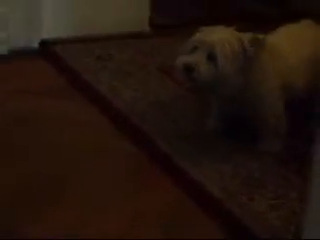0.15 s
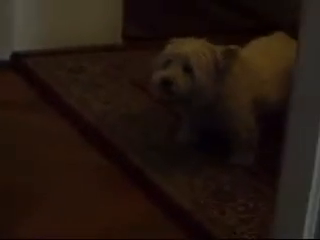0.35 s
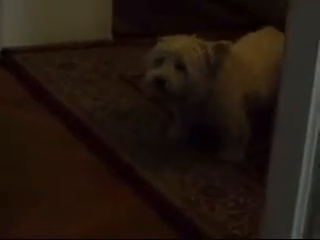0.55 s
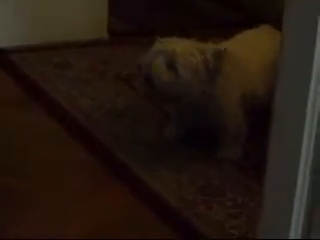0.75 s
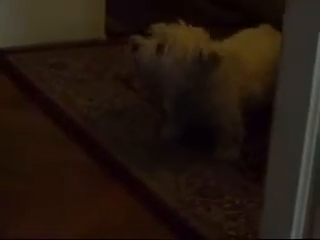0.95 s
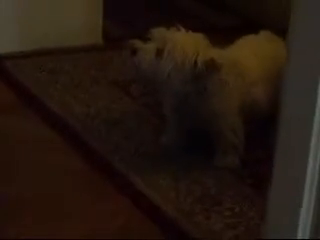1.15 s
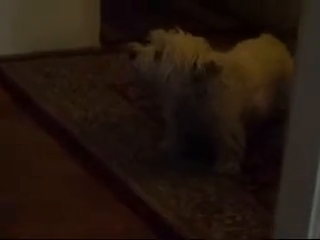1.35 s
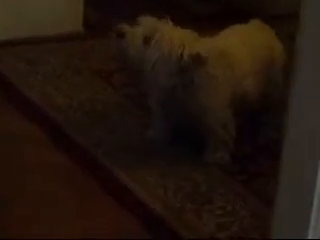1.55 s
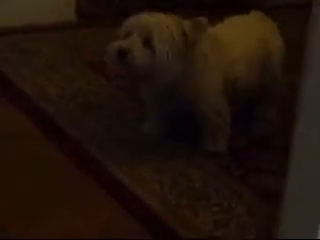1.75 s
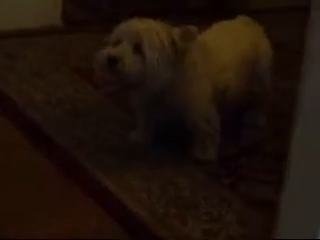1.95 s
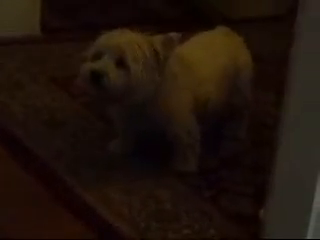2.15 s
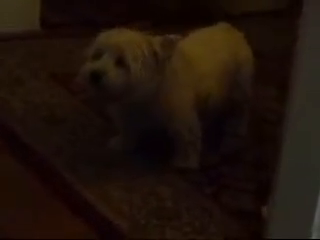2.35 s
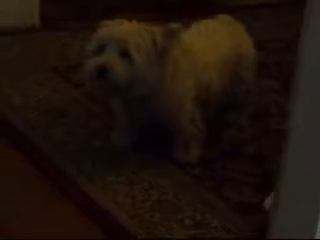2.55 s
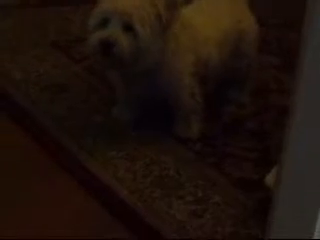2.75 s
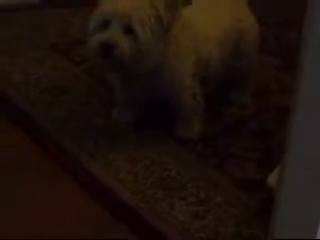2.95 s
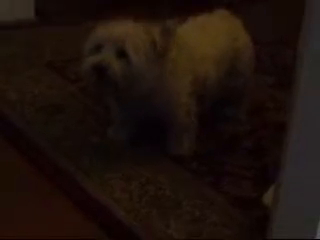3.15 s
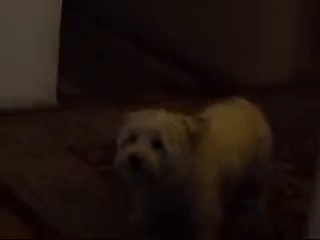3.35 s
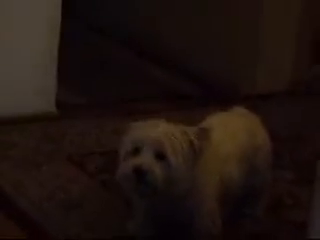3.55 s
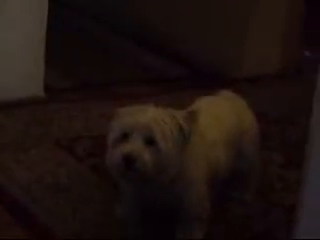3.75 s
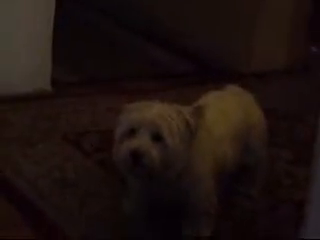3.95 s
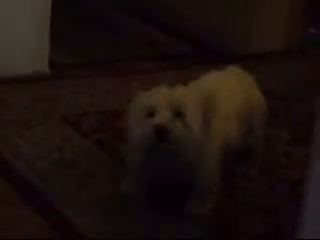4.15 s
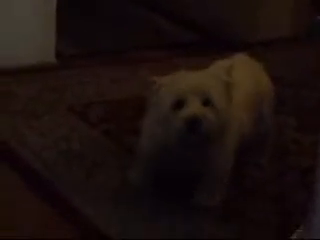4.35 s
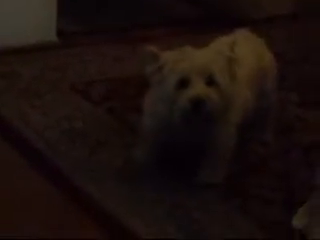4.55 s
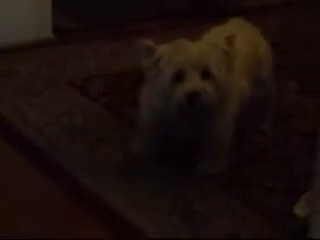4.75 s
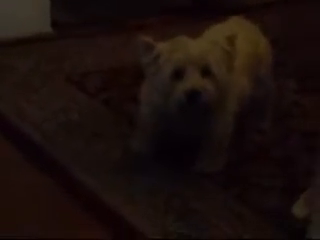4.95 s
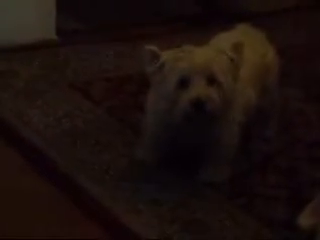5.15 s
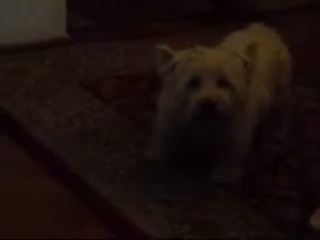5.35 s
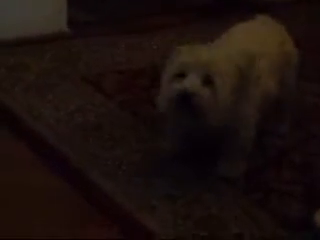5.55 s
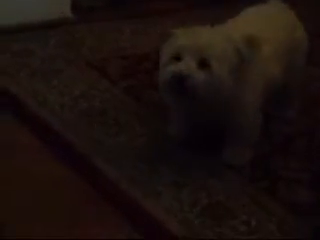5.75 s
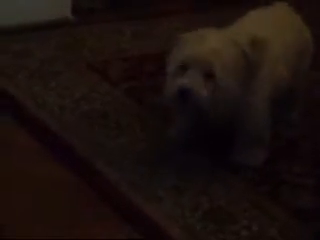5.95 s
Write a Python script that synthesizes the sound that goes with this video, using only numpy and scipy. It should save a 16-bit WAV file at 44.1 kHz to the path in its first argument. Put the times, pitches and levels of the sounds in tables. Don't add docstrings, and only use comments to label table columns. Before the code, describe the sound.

High, slightly hoarse barks from a little dog echo briefly indoors, while faint rushing hum, wavering whine and small woody bumps lie beneath.

```python
import sys
import numpy as np
from scipy import signal
from scipy.fft import rfft, irfft
from scipy.io import wavfile
from scipy.ndimage import uniform_filter1d, map_coordinates

SR = 44100
rng = np.random.default_rng(int(sys.argv[2]) if len(sys.argv) > 2 else 0)


def boost(x):
    u = np.asarray(x, float) / 20
    return 10 ** u


def persist_wave(psi):
    counts = np.round(np.clip(psi, -1, 1) * 32767).astype(np.int16)
    wavfile.write(sys.argv[1], SR, np.atleast_2d(counts).T)


N = 265041

# [f/Hz, width/Hz, level/dB]
THROAT = [(602, 120, 13.5), (1065, 145, 22.5), (1348, 82, 20.5), (1864, 208, 19), (2290, 67, -10),
          (2694, 476, 12), (3430, 480, -5), (4790, 1100, -0.5), (6370, 1800, -5)]
# [f/Hz, width/Hz, lift/dB]
MOUTH_RINGS = [(1930, 200, 11), (2305, 100, 14)]


def bark(climax_s, voice_db, shelf_db, second_top_db, first_hz, held_hz, last_hz, third_top_db):
    longest_s, release_s = .24, .07
    t = np.arange(int(longest_s * SR)) / SR
    end_s = climax_s + release_s

    release_db_per_s = 230 + 3.5 * (held_hz - last_hz)
    wake_db = hump(t, .06, rise_db=600, fall_db=0, top_db=0)
    shelf = shelf_db * np.clip((climax_s - t) / .032, 0, 1)
    first_db = hump(t, climax_s, 0, release_db_per_s, voice_db) + wake_db + shelf
    second_db = second_top_db + hump(t, .056, rise_db=260, fall_db=340, top_db=.5)
    third_db = third_top_db + hump(t, .075, rise_db=10, fall_db=450, top_db=0)
    rasp_db = hump(t, .032, rise_db=300, fall_db=190, top_db=-29.5)
    curves = (first_db, second_db, third_db, rasp_db)
    first_db, second_db, third_db, rasp_db = (uniform_filter1d(c, size=400) for c in curves)

    hoarse = .35 + np.exp(-t / .05)
    glide_s, sag_lead_s, sag_s = .08, .024, .065
    slack = np.clip((t - climax_s + sag_lead_s) / sag_s, 0, 1) ** 1.3
    climb = np.clip(1 - t / glide_s, 0, 1) ** 2
    hz = held_hz - (held_hz - first_hz) * climb - (held_hz - last_hz) * slack
    for ring_hz, width_hz, lift_db in MOUTH_RINGS:
        third_db = third_db + lift_db / (1 + (2 * (3 * hz - ring_hz) / width_hz) ** 2)
    jitter, shimmer_db = .02, 3
    hz = hz * (1 + jitter * hoarse * walk(400, len(t)))
    phase = 2 * np.pi * np.cumsum(hz) / SR

    voice = np.zeros(len(t))
    partials_db = [first_db, second_db, third_db, rasp_db - 6, rasp_db - 17]
    for number, db in enumerate(partials_db, start=1):
        shimmer = shimmer_db * np.sqrt(number) * hoarse * walk(146.1, len(t))
        voice += np.sqrt(2) * boost(db + shimmer) * np.sin(number * phase)

    puffs = 1 + .57 * np.cos(phase)
    air = rng.standard_normal(len(t)) * puffs * boost(1.36 * walk(203, len(t)))
    throat = sum(boost(db) * steep(air, f, width_hz) for f, width_hz, db in THROAT)
    rasp = level(throat, 13.1) * boost(rasp_db)
    edge = np.clip(np.minimum(t, end_s - t) / .03, 0, 1)
    return (voice + rasp) * edge ** 1.4


# [start t/s, climax after start t/s, lowest tone level/dB, its shelf before the climax level/dB,
# second partial level/dB]
BARKS = [
    (-0.012, .104, -6, -8, -15),
    (0.836, .126, -6, -5, -17),
    (1.609, .118, -9.5, -2, -13.5),
    (3.231, .124, -4, -8, -13),
    (4.103, .123, -3, -18, -12),
    (5.482, .13, -5, -10, -11),
    (5.84, .108, -4, -8, -12),
]
# [first f/Hz, held f/Hz, last f/Hz, third partial level/dB]
TUNES = [(460, 748, 620, -27), (470, 750, 690, -32), (430, 752, 620, -32), (390, 772, 705, -34),
         (370, 772, 695, -31), (430, 782, 715, -31), (440, 750, 670, -32)]


def dog():
    out = np.zeros(N + 2 * SR)
    for (start_s, *shape), tune in zip(BARKS, TUNES):
        call = bark(*shape, *tune)
        at = int((start_s + 1) * SR)
        out[at:at + len(call)] += call
    return out[SR:SR + N]


# [t/s, tap level/dB, thud level/dB, snap level/dB, time to fade by 60 dB t/s]
KNOCKS = [
    (2.19, -31, -44, -46, 0.16),
    (2.644, -30, -32, -29, 0.08),
    (2.699, -33, -32, -27, 0.06),
    (2.712, -30, -30, -32, 0.08),
    (2.73, -37, -35, -41, 0.09),
    (2.787, -33, -51, -43, 0.089),
    (2.814, -36, -48, -45, 0.053),
]


def knocks():
    out, t = np.zeros(N), np.arange(6000) / SR
    for start_s, tap_db, thud_db, snap_db, t60_s in KNOCKS:
        noise = rng.standard_normal(len(t))
        fade = np.exp(-np.log(1000) * t / t60_s) * np.clip(t / .003, 0, 1)
        tap = level(steep(noise, 800, 250), tap_db)
        thud = level(steep(noise, 310, 250), thud_db - .5)
        snap = level(steep(noise, 1640, 1200), snap_db + 1.5)
        at = int(start_s * SR)
        out[at:at + len(t)] += (tap + thud + snap) * fade
    return out


def hall(x):
    bass_t60_s, treble_t60_s = .4, .4
    direct_db, echo_db = -.7, -10
    t = np.arange(SR) / SR
    low, high = rng.standard_normal((2, len(t)))
    split = signal.butter(1, 1600, fs=SR)
    bass = signal.lfilter(*split, low) * np.exp(-np.log(1000) * t / bass_t60_s)
    treble = (high - signal.lfilter(*split, high)) * np.exp(-np.log(1000) * t / treble_t60_s)
    echoes = (bass + treble) * np.clip((t - .004) / .01, 0, 1)
    echoes *= boost(echo_db) / np.sqrt(np.sum(echoes ** 2))
    return boost(direct_db) * x + signal.fftconvolve(x, echoes)[:N]


# [f/Hz, level per Hz/dB]
HISS_COLOUR = [(18, -48), (30, -26), (70, -22.5), (185, -11), (345, -8.5), (406, -6), (535, -2.5),
               (705, -6.5), (810, -7), (1900, -9), (4260, -12), (4560, -11), (7400, -12), (9620, -57),
               (16300, -120)]


def hiss(load_db):
    hz = np.fft.rfftfreq(N, 1 / SR)
    f, db = np.transpose(HISS_COLOUR)
    colour = boost(np.interp(np.log(hz + 1), np.log(f), db))
    noise = irfft(rfft(rng.standard_normal(N)) * colour, N)
    return level(noise, 5.1) * boost(-42.5 + load_db)


# [f/Hz, width/Hz, level/dB]
HUMPS = [(634.5, 25, -4.5), (794, 114, -1.5), (1250, 20, -14), (1680, 14, -17)]


def humps(load_db):
    t = np.arange(N) / SR
    ringing = np.zeros(N)
    for f, width_hz, db in HUMPS:
        flicker = boost(1.87 * walk(14, N))
        ringing += level(band(rng.standard_normal(N), f, width_hz), db) * flicker
    after_bark = np.zeros(N)
    for start_s, climax_s, bark_db, *_ in BARKS:
        after_bark += boost(bark_db + hump(t - start_s - climax_s, .03, rise_db=400, fall_db=130, top_db=-25))
    return ringing * (boost(-42.5 + 1.2 * load_db) + after_bark)


# [start t/s, length t/s, level/dB]
WHINE = [
    (-.03, .25, -47),
    (1.036, 0.36, -46),
    (1.48, .14, -51),
    (1.738, .15, -47),
    (1.98, .42, -51),
    (2.75, .85, -54.5),
    (3.6, .55, -49),
    (4.15, 1.13, -50),
    (5.5, 0.33, -50),
]


def whine():
    t = np.arange(N) / SR
    rest_db, fade_s = -56.5, .08
    spells = np.zeros(N)
    for start_s, length_s, db in WHINE:
        inside_s = np.minimum(t - start_s, start_s + length_s - t)
        spells += boost(db) * np.clip(inside_s / fade_s + .5, 0, 1)
    strength = np.maximum(spells, boost(rest_db)) * boost(.7 * walk(4.98, N))
    return np.sqrt(2) * strength * np.sin(2 * np.pi * 4460.5 * t)


# [t/s, level/dB]
LOAD = [(0, .5), (1.6, 0), (2.4, -1), (3.2, 0.5), (3.9, -1.5), (4.6, 0), (5.3, -1), (6.01, 1)]


def drone():
    load_db = np.interp(np.arange(N) / SR, *np.transpose(LOAD))
    return hiss(load_db) + humps(load_db) + whine()


def hump(t, at, rise_db, fall_db, top_db):
    return top_db - np.maximum(rise_db * (at - t), fall_db * (t - at))


def walk(rate, size):
    k = int(SR / rate)
    steps = np.repeat(rng.standard_normal(size // k + 1), k)
    return 1.53 * uniform_filter1d(uniform_filter1d(steps, k), k)[:size]


def level(x, db):
    return x * boost(db) / np.sqrt(np.mean(x ** 2))


def band(x, hz, width_hz):
    return signal.lfilter(*signal.iirpeak(hz, hz / width_hz, SR), x)


def steep(x, hz, width_hz):
    return band(band(x, hz, 1.44 * width_hz), hz, 1.44 * width_hz)


def scene():
    return (hall(dog() + knocks()) + drone())[None]


def low_pass(x):
    return signal.sosfilt(signal.butter(12, 12790, fs=SR, output="sos"), x)


def record(dry):
    camera_hz = 15000
    smooth = signal.sosfilt(signal.butter(6, 6900, fs=SR, output="sos"), dry)
    held = np.floor(np.arange(N) * camera_hz / SR) * SR / camera_hz
    steps = np.array([map_coordinates(c, [held], order=3) for c in smooth])
    rounded = steps / (1 + steps ** 10) ** (1 / 10)
    top = signal.ellip(10, .3, 70, 12600, fs=SR, output="sos")
    mix = signal.sosfilt(top, rounded)
    return low_pass(mix)


dry = scene()
out = record(dry)
persist_wave(out)
```